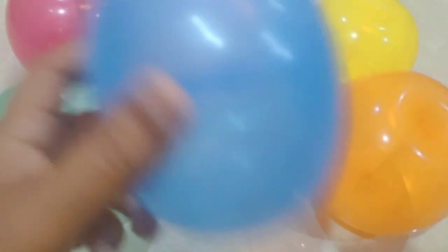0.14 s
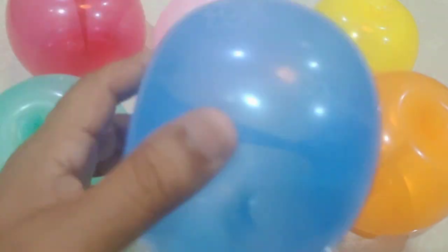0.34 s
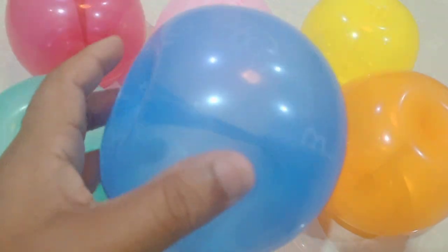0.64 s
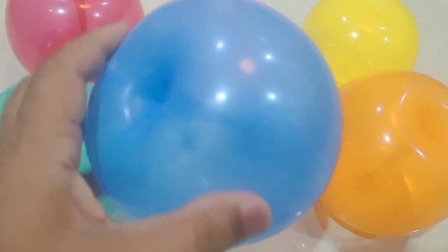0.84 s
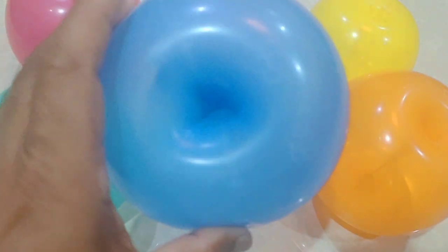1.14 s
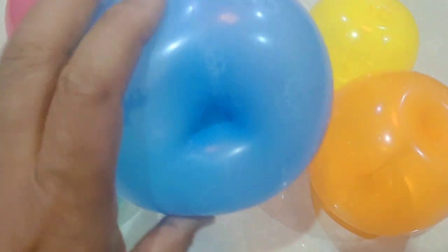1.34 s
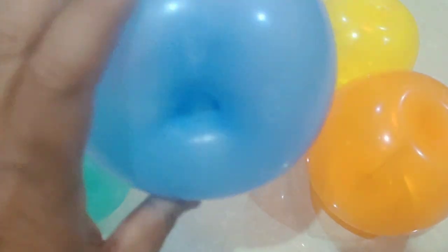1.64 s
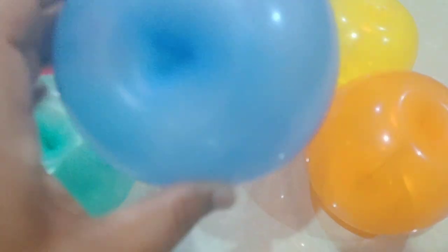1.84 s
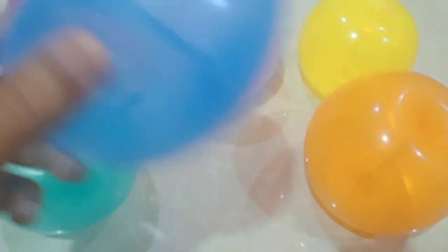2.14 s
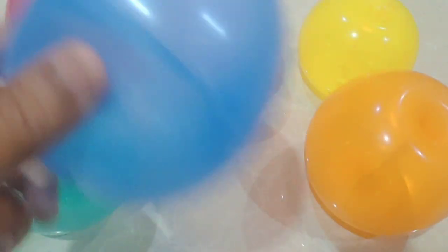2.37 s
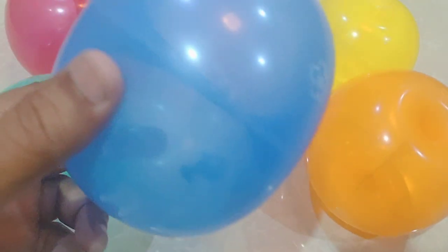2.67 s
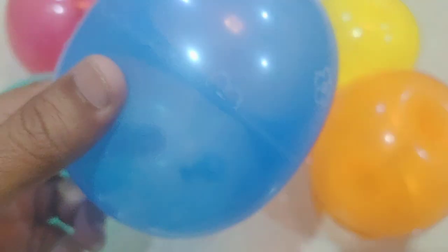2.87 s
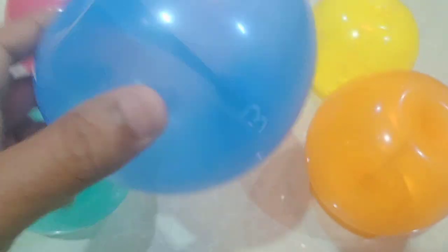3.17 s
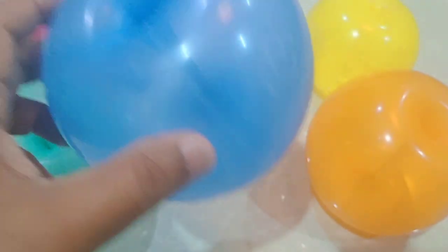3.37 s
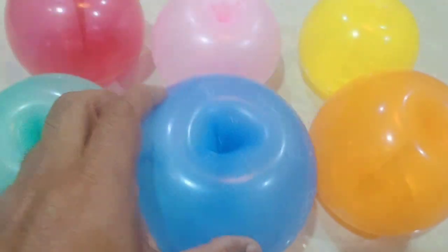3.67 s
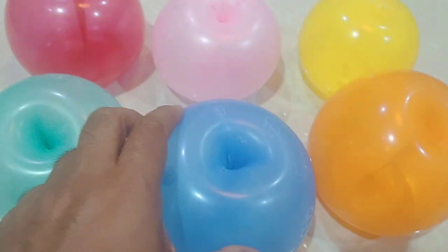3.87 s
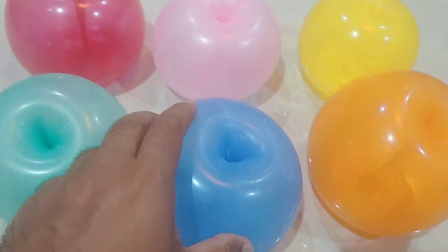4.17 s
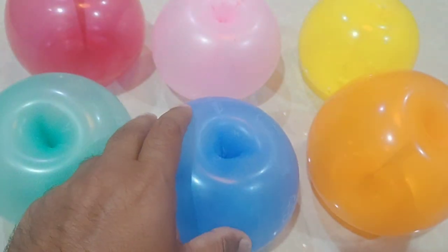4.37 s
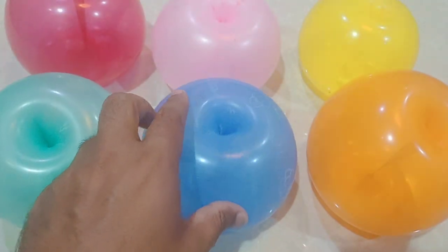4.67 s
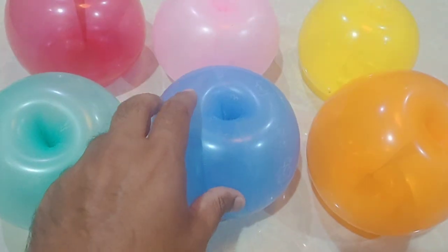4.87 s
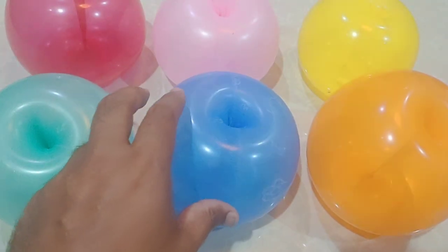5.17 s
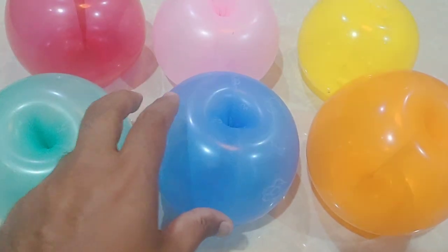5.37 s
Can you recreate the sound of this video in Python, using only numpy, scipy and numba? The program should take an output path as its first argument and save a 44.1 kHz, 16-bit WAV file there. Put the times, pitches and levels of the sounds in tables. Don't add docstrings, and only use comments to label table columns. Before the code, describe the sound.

Hollow balloon thumps and rubbery pops, a few short squeaks, then stuttering rubber creaks as the balloon is set down indoors.

```python
import sys
import numpy as np
from scipy import signal
from scipy.fft import rfft, irfft
from scipy.io import wavfile
from scipy.ndimage import uniform_filter1d
from numba import njit

SR = 44100
rng = np.random.default_rng(int(sys.argv[2]) if len(sys.argv) > 2 else 0)


def pcm_store(signal):
    levels = np.round(np.clip(np.atleast_2d(signal), -1, 1) * 32767)
    wavfile.write(sys.argv[1], SR, levels.astype(np.int16).T)


def convert_level_to_amplitude(level_db):
    exponent = np.asarray(level_db, float) / 20
    return 10 ** exponent


N = 242991


def unit(x):
    return x / np.sqrt(np.mean(x ** 2))


def colour(x, points):
    hz, db = np.transpose(points)
    bins_hz = np.arange(1025) * SR / 2048 + 1
    log_gain = np.interp(np.log(bins_hz), np.log(hz), db) * np.log(10) / 20
    cepstrum = irfft(log_gain)
    cepstrum[1:1024] = 2 * cepstrum[1:1024]
    cepstrum[1025:] = 0
    impulse = irfft(np.exp(rfft(cepstrum)))
    return signal.fftconvolve(x, impulse)[:len(x)]


# (frequency [Hz], level per Hz [dB])
QUIET_TONE = [(12, -39.5), (20, -0.5), (65, -8.5), (130, -23), (459, -24.5), (499, -26.5), (542, -24.5),
              (923, -28.5), (2600, -31), (3950, -36.5), (4670, -42.5), (5080, -36.5), (16000, -46.5)]
# (frequency [Hz], rms level [dB])
MAINS_HUM = [(49.5, -79), (99.5, -93), (495.3, -89), (775, -99), (1560, -94.5)]


def quiet():
    shared, left, right = (colour(rng.standard_normal(N), QUIET_TONE) for _ in range(3))
    noise = unit(0.68 * shared + np.array([left, right]))
    t = np.arange(N) / SR
    hum = sum(np.sqrt(2) * convert_level_to_amplitude(db) * np.sin(2 * np.pi * hz * t) for hz, db in MAINS_HUM)
    return convert_level_to_amplitude(-69) * noise * 0.84 + hum


# (time [s], left minus right [dB], air pitch [Hz], skin pitch [Hz])
HOLD_PATH = [(0.0, -4, 620, 259), (0.25, -2.5, 604, 242), (0.51, -3.5, 670, 275.4),
             (0.89, -0.5, 609, 276.6), (1.07, -2.5, 622, 286), (1.4, -1, 744, 304.4),
             (1.998, -1.5, 572, 269.4), (2.15, -6.0, 639, 245), (2.391, -2.5, 626, 268.3),
             (2.9, -4, 632, 260), (2.98, -2.5, 629, 253), (3.26, -2.5, 609, 283), (3.46, -1, 711, 274),
             (4.16, -0.5, 659, 260), (4.481, 0.5, 735, 249.5), (4.63, -0.5, 739, 271), (5.31, 3, 712, 254),
             (5.4, -4, 647.9, 268)]


def hold(t):
    s, *columns = np.transpose(HOLD_PATH)
    return [np.interp(t, s, column) for column in columns]


@njit
def svf(x, hz, width):
    y, band, low = np.empty(len(x)), 0., 0.
    for i in range(len(x)):
        g, k = np.tan(np.pi * hz[i] / SR), width / hz[i]
        v = (band + g * (x[i] - low)) / (1 + g * (g + k))
        band = 2 * v - band
        low += 2 * g * v
        y[i] = k * v
    return y


def ring(x, modes, tune, low_hz, high_hz):
    y = sum(convert_level_to_amplitude(db) * svf(x + 1e-18, hz * tune, 1. * width) for hz, width, db in modes)
    band = signal.butter(2, (low_hz, high_hz), "band", fs=SR, output="sos")
    return signal.sosfilt(band, y)


# (frequency [Hz], left minus right [dB])
PORT_TONE = [(2200, -1), (4000, 3), (8000, -4), (13000, 1)]


def port(x, side):
    return colour(x, [(hz, side * db / 2) for hz, db in PORT_TONE])


# (frequency [Hz], width [Hz], level [dB])
AIR_MODES = [(567.6, 6.9, -10.5), (653.7, 51, 4), (759, 155, -3.5), (987.1, 420, -13.5)]


def air_inside(x, air_hz, side):
    return ring(x, AIR_MODES, (air_hz / 660) ** 0.98 * (1 + .004 * side), 300, 1600)


# (frequency [Hz], width [Hz], level [dB])
SKIN_MODES = [(210.6, 24, -7), (260, 38.4, 1.5), (303.6, 13, -7.5), (387, 18, -11.5)]


def rubber_skin(x, skin_hz, side):
    return ring(x, SKIN_MODES, (skin_hz / 260) ** 0.79 * (1 + 0.015 * side), 177, 520)


# (frequency [Hz], width [Hz], level [dB])
UPPER_MODES = [(954, 34, 7), (1023, 17, -4), (1208, 24, 4), (1360, 87, 1.5), (1482, 160, -4),
               (1742, 100, -5), (1938, 230, -8.5), (2350, 490, -14), (2630, 91, -14.5), (2982, 290, -11),
               (3350, 83, -10.5)]


def upper_modes(x, side):
    return port(ring(x, UPPER_MODES, np.full(N, 1 + 0.01 * side), 873, 2760), side)


# (frequency [Hz], level per Hz [dB])
HISS_TONE = [(2240, -37), (3800, -7), (4810, -13.5), (5190, -7.5), (6380, -4), (7010, -0.5), (10500, -18.5),
             (13500, -24.5), (15500, -23.5)]


def top_hiss(x, side):
    return port(colour(x, HISS_TONE), side)


# (frequency [Hz], width [Hz], level [dB])
THUMP_MODES = [(85, 15, 0), (112, 28, -11), (55, 20, -17)]


def thump(x, side):
    return ring(x, THUMP_MODES, np.full(N, 1 + .075 * side), 45, 180)


# (time [s], level [dB])
HAND_UNREST = [(0, -42.5), (.2, -50), (.5, -49.5), (.65, -51.5), (.85, -65.5), (1.12, -70), (1.49, -54),
               (1.76, -78), (2.04, -56), (2.14, -79.5), (2.25, -45.5), (2.37, -57.5), (2.51, -44),
               (2.77, -53), (2.85, -74), (3.32, -93), (4.17, -70.5), (5.5, -91.5)]
# (air, skin, upper modes, top hiss [dB])
GRIP_SHARE = (-11, -4, -28.5, -29.5)


def grip_rustle(t):
    unrest = convert_level_to_amplitude(np.interp(t, *np.transpose(HAND_UNREST)))
    share = np.append(convert_level_to_amplitude(GRIP_SHARE), 1)
    return (share[:, None] * unrest) ** 2


# (time [s], air peak [dB], skin against air [dB], upper modes against air [dB], scuff t60 [s])
PLUCK_TIMES = [(.015, -38.5, -16, -1.5, 0.031), (0.123, -30.5, -9, -14, 0.11),
               (.175, -33.5, 0.5, -7.5, 0.32), (0.27, -40, 10.5, -10, .066), (.565, -33, -1, -6, 0.089),
               (.684, -38.5, -16, -18, 0.032), (.696, -31.5, -26, -15, 0.037), (.718, -27, -15, -25, 0.055),
               (0.806, -33.5, -2, -26, 0.16), (.846, -20.5, -9, -21, 0.14), (0.858, -21.5, -6, -19, 0.028),
               (.9, -26.5, -8, -16.5, 0.11), (0.999, -49, 2, -11, 0.0484), (1.035, -30, -6.5, -9.5, 0.11),
               (1.562, -58, 2, -1, 0.054), (1.34, -27, -19, 5, 0.017), (1.428, -33.5, -25, -8.5, 0.04),
               (1.472, -34.5, -18, -4, 0.031), (2.382, -31, 2.5, -10, 0.13), (2.443, -28.5, -3, -5, .068),
               (3.179, -57, -10.5, 4, .012), (3.27, -41, -23, -14, 0.097), (4.998, -40, -3, -9, 0.095)]


def plucks():
    return [(s, air, -25.5, skin, upper, t60) for s, air, skin, upper, t60 in PLUCK_TIMES]


# (time [s], air peak [dB], then against air: thump [dB], skin [dB], upper modes [dB])
TAP_TIMES = [(.04, -33.5, 0.5, -0.5, -5.5), (0.081, -48, 2, 15, 6.5), (.187, -28.5, -5.5, -8, -7),
             (.204, -34.5, 1.5, -3, -4.5), (.248, -25, 3.2, -5, -4.5), (.311, -37, -0.5, -14, -2),
             (.399, -33, 6, 4.5, -3.5), (.475, -34.5, 11, -3.5, -7), (.552, -30.5, -7.5, -20, -17.5),
             (1.592, -46.5, 9.5, 4.5, 3), (1.601, -37.5, -7, 1.5, -8.5), (1.664, -46.5, 6, -15, -3),
             (1.71, -35, -6, 1, -15), (2.015, -51.5, -10, 7, -19), (2.175, -35, 3.5, -1.5, -13.5),
             (2.2, -36.5, 0, -3, -11), (2.233, -42.5, 11, 1, -12), (2.269, -33.5, 3, -6.5, -10),
             (2.372, -32.5, 6.5, 3.5, 2), (2.486, -31, 3, -12.5, -9), (2.534, -28, 2.5, 6, -20.5),
             (2.592, -29, 7, -3.5, -7), (2.691, -34.5, -1.5, -10, -6.5), (2.765, -53, -8, -13, -7)]


def taps():
    return [(*row, 0.1) for row in TAP_TIMES]


# (skin, upper modes, top hiss [dB per dB])
LIGHT_TOUCH = (0.18, 0.21, 0.36)


def drag_power(t, drags, shares):
    skin, upper, top, deep, touch_db, lift_db = shares
    power = np.zeros((5, N))
    for touch, hardest, lift, air, bright in drags:
        on = (t >= touch) & (t <= lift)
        rise = (hardest - t[on]) / (hardest - touch)
        fall = (t[on] - hardest) / (lift - hardest)
        lost = np.where(fall < 0, touch_db * np.abs(rise) ** 1.29, lift_db * np.abs(fall) ** 1.364)
        levels = (0, skin, upper + bright, top + bright, deep)
        for k, (db, tilt) in enumerate(zip(levels, (0, *LIGHT_TOUCH, 0))):
            power[k, on] += convert_level_to_amplitude(air + db - (1.5 - tilt) * lost) ** 2
    return power


# (touch time [s], hardest time [s], lift time [s], air level [dB], brightness [dB])
HELD_DRAGS = [(.6, .67, 0.87, -51.5, 3.5), (.806, .83, .86, -50.5, 11.5), (.855, .89, .96, -36, -5.5),
              (.98, 1.03, 1.055, -55.5, 12), (1.08, 1.14, 1.23, -44, 5), (1.345, 1.356, 1.475, -49.5, 13),
              (1.415, 1.437, 1.494, -37.5, 0.5), (1.455, 1.475, 1.552, -51.5, 6.5),
              (1.55, 1.596, 1.69, -54.5, -1), (1.64, 1.722, 1.82, -47, -7.5),
              (1.89, 1.99, 2.178, -51, -0.5), (2.175, 2.185, 2.185, -38.5, 1.5),
              (2.72, 2.77, 2.84, -54, -15), (1.295, 1.315, 1.37, -52.5, 5.5), (3.255, 3.276, 3.1, -60, -7)]
# (skin, upper modes, top hiss, thump [dB], level lost at touch [dB], at lift [dB])
HELD_SHARE = (1.5, -12.5, -25.5, -29, 11.5, 33)


def held_drags(t):
    return drag_power(t, HELD_DRAGS, HELD_SHARE)


# (start [s], end [s], slips per second at start [Hz], at end [Hz], scatter [0-1])
CREAK_TIMES = [(.82, .838, 1100, 2500, .08), (.862, .925, 280, 300, .3), (1.085, 1.175, 230, 245, .26),
               (1.415, 1.452, 780, 900, .09), (1.462, 1.487, 690, 765, .06), (1.9, 2.12, 260, 200, .55),
               (3.577, 3.62, 270, 300, .22), (4.05, 4.115, 225, 230, .18), (4.115, 4.3, 240, 300, .22),
               (4.665, 4.692, 130, 135, .05), (4.692, 4.805, 265, 200, .12)]


def slipping(t):
    rate, scatter = np.full(N, 380.), np.full(N, .6)
    for start, end, first, last, spread in CREAK_TIMES:
        on = (t >= start) & (t < end)
        rate[on] = np.interp(t[on], (start, end), (first, last))
        scatter[on] = spread
    return rate, scatter


@njit
def slips(rate, scatter, chance):
    out, phase, k = np.zeros(len(rate)), 0., 0
    for i in range(len(rate)):
        phase += rate[i] * np.exp(scatter[i] * chance[k, 0]) / SR
        if phase >= 1:
            phase, k = phase - 1, k + 1
            out[i] = np.exp(.6 * scatter[i] * chance[k, 1])
    return out


# (touch time [s], hardest time [s], lift time [s], air level [dB], brightness [dB])
TABLE_DRAGS = [(3.19, 3.235, 3.3, -65.5, 0), (3.6, 3.65, 3.84, -58.5, -2.5),
               (3.73, 3.773, 3.88, -45.5, -8.5), (4.15, 4.202, 4.26, -53, 7.5),
               (4.28, 4.36, 4.47, -54.5, -3.5), (4.38, 4.43, 4.61, -50.5, -4), (4.5, 4.555, 4.74, -51, -4),
               (4.78, 4.87, 5.125, -54.5, 1.5), (4.98, 5.01, 5.16, -58, -7), (5.05, 5.085, 5.32, -61, -1),
               (5.1, 5.18, 5.35, -70.5, -11)]
# (skin, upper modes, top hiss, thump [dB], level lost at touch [dB], at lift [dB])
TABLE_SHARE = (-11, -0.5, -17, -21, 13.5, 30)


def table_drags(t):
    return drag_power(t, TABLE_DRAGS, TABLE_SHARE)


# (time [s], air peak [dB], upper modes against air [dB], scuff t60 [s])
SNAG_TIMES = [(3.568, -41.5, -18, .03), (3.576, -25, -4.5, 0.066), (3.767, -32, -36, 0.098),
              (4.005, -19, -5, 0.031), (4.014, -20.5, -5.5, 0.039), (4.022, -21, -8, .026),
              (4.031, -21, -5, 0.02), (4.039, -32, -18, 0.014), (4.05, -23.5, -10, 0.086),
              (4.066, -21.5, -32, 0.17), (4.114, -31, -3, 0.049), (4.246, -46, 3, 0.17),
              (4.453, -27.5, -11.5, 0.033), (4.667, -35, -4, 0.025), (5.073, -40.5, 2.5, 0.083)]


def snags():
    return [(s, air, -33, -18, upper, t60) for s, air, upper, t60 in SNAG_TIMES]


# (grab time [s], end of hold [s], free time [s], air level [dB], brightness [dB])
JERK_TIMES = [
    (3.577, 3.598, 3.674, -36.5, -0.5),
    (4.036, 4.044, 4.054, -43, -1),
    (4.052, 4.088, 4.115, -34.5, -2),
    (4.114, 4.158, 4.205, -34.5, -4),
    (4.247, 4.285, 4.33, -48.5, 3),
    (4.449, 4.456, 4.47, -45, -5),
    (4.666, 4.775, 4.89, -41.5, 4.5),
]
# (skin, upper modes, top hiss, thump [dB], level lost at touch [dB], at lift [dB])
JERK_SHARE = (-9.5, 0, -17, -16, -2, 49)


def jerks(t):
    return drag_power(t, JERK_TIMES, JERK_SHARE)


def bumps(push_s, scuff_db):
    force, t = np.zeros((5, N + SR)), np.arange(SR // 5) / SR
    for s, air, deep, skin, upper, t60 in plucks() + taps() + snags():
        patter = rng.standard_normal(len(t)) * rng.exponential(size=len(t))
        tail = patter * np.exp(-np.log(1000) * t / max(t60, .005))
        top = 1.17 * upper - 11
        for k, db in enumerate((0, skin, upper, top, deep)):
            push = np.sin(np.pi * np.clip((t + .5 / SR) / push_s[k], 0, 1)) ** 2
            blow = push / push.sum() + convert_level_to_amplitude(scuff_db[k]) * tail
            force[k, int(s * SR):][:len(t)] += convert_level_to_amplitude(air + db) * blow
    return force[:, :N]


def balloon():
    t = np.arange(N) / SR
    gain = np.sqrt(grip_rustle(t) + held_drags(t) + table_drags(t) + jerks(t))
    pan_db, air_hz, skin_hz = hold(t)
    rate, scatter = slipping(t)
    clicks = unit(slips(rate, scatter, rng.standard_normal((N // 20, 2))) / np.sqrt(rate))
    blows = bumps(push_s=(.0005, .0012, .0002, .00006, .003), scuff_db=(-28, -37, -25, -21, -54))
    hiss_db = (-9.5, -1, 4.5, 10.0, -28.5)
    lean_db = (-14, -7.5, -7.5, -1.5, -3.5)
    lean = [unit(uniform_filter1d(rng.standard_normal(N), size=n)) for n in (30, 60, 6, 2, 90)]
    impulse = 1. * (np.arange(SR // 10) == 0)
    out = np.zeros((2, N))
    for c, side in enumerate((1, -1)):
        parts = (lambda x: air_inside(x, air_hz, side),
                 lambda x: rubber_skin(x, skin_hz, side),
                 lambda x: upper_modes(x, side),
                 lambda x: top_hiss(x, side),
                 lambda x: thump(x, side))
        for k, part in enumerate(parts):
            rub = clicks + convert_level_to_amplitude(hiss_db[k]) * scatter * rng.standard_normal(N)
            share = 1 + side * convert_level_to_amplitude(lean_db[k]) * np.tanh(2 * lean[k])
            rub_level = np.std(part(rub[:SR]))
            tap_peak = np.abs(part(impulse)).max()
            out[c] += part(share * (gain[k] * rub / rub_level + blows[k] / tap_peak))
        out[c] *= convert_level_to_amplitude(side * pan_db / 2)
    out[0] = np.roll(out[0], 5)
    return out


def room(x):
    t = np.arange(SR // 2) / SR
    tail = rng.standard_normal((2, len(t))) * np.exp(-np.log(1000) * t / 0.45)
    tail *= t > .006
    tail = signal.lfilter([1, -1], [1, -.96], tail / np.sqrt(np.sum(tail[0] ** 2)))
    return convert_level_to_amplitude(-19) * signal.fftconvolve(x.mean(0)[None], tail, axes=1)[:, :N]


def scene():
    near = balloon()
    return near + room(near) + quiet()


def low_pass(x):
    return signal.sosfilt(signal.butter(12, 16610, fs=SR, output="sos"), x)


def record(dry):
    top_cut = signal.ellip(8, .2, 40, 15750, fs=SR, output="sos")
    mix = signal.sosfilt(top_cut, dry)
    return low_pass(mix)


dry = scene()
out = record(dry)
pcm_store(out)
```